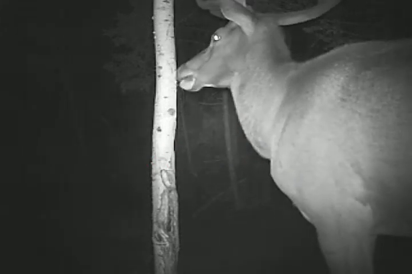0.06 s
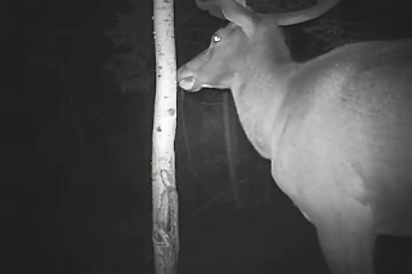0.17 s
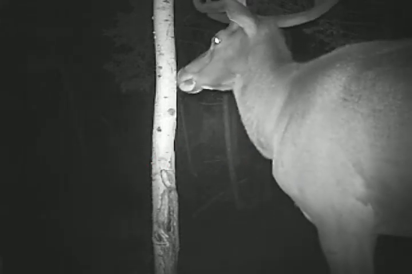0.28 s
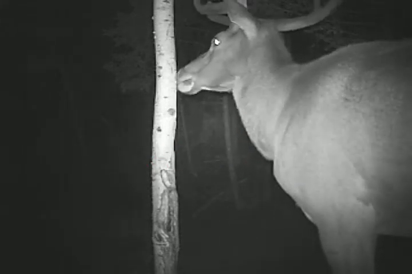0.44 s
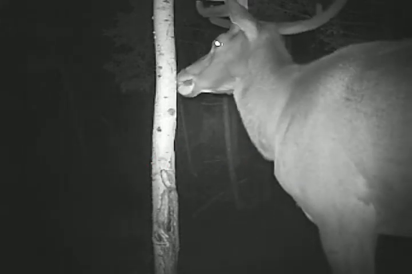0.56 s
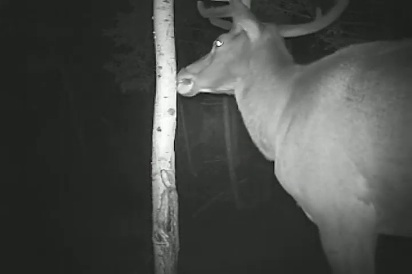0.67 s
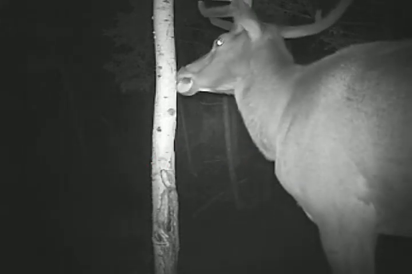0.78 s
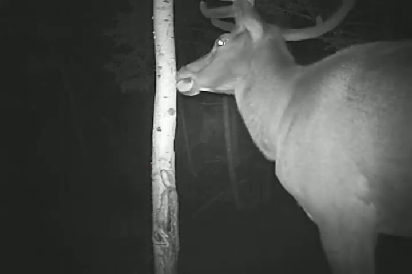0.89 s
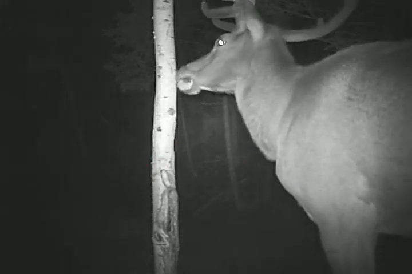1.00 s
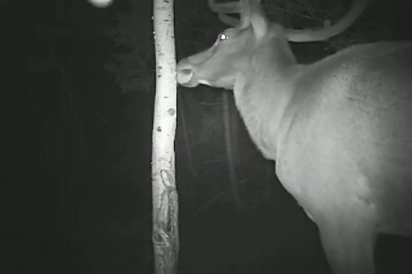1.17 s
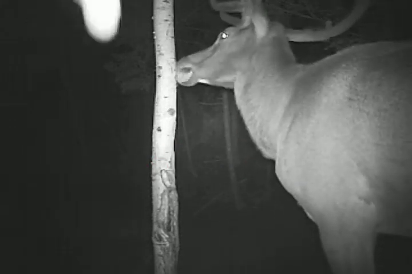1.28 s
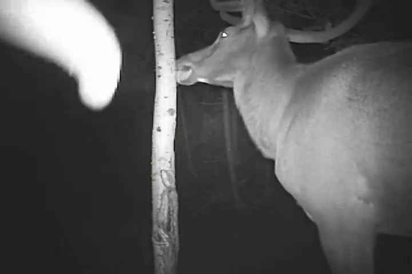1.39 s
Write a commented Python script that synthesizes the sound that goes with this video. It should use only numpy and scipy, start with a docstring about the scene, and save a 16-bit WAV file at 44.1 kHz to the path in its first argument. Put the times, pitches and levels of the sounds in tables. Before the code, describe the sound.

Antlers rasp and clack on bark in two brief strokes, the trunk thrumming low under each. Light taps and a soft rustle fall between them. The microphone is close, outdoors at night, with quiet hiss and air rumble.

```python
"""An elk rubs its antlers on a slim tree at night, close by, over air rumble, recorder hiss and a faint whine.
Two light taps, then a short stroke at 0.2 s: the antler catches and slips on the bark, a gritty rasp
with sharp clacks, while the trunk thrums and the tines ring faintly. A few taps and a soft rustle follow.
A second stroke comes at 0.95 s; low thuds close it and the rustle fades."""
import sys
import numpy as np
from scipy import signal
from scipy.fft import rfft, irfft
from scipy.io import wavfile
from scipy.ndimage import uniform_filter1d, map_coordinates

SR = 44100
rng = np.random.default_rng(int(sys.argv[2]) if len(sys.argv) > 2 else 0)


def wav_out(sig):
    """Save sig, one row per channel (or a flat mono array), as 16-bit PCM at SR to the path in sys.argv[1]."""
    wavfile.write(sys.argv[1], SR, np.round(np.clip(np.atleast_2d(sig).T, -1, 1) * 32767).astype(np.int16))


N = 63945

# resonances of antler on bark: centre_hz, width_hz, gain_db
CONTACT_RESONANCES = [(329, 186, -11.5), (501, 108, -10.5), (620, 234, -12), (933, 90, 0.5), (1410, 65, -1),
                      (1596, 60, -6.5), (1784, 70, -10.5), (1967, 31, -6.5), (2266, 76, -1.5),
                      (2453, 92, -2.5), (3015, 96, 2), (3250, 120, -5.5), (3525, 49, 1), (3951, 51, 1),
                      (4290, 59, -10), (5010, 160, -3)]
# bark crackle spectrum: freq_hz, gain_db
BARK_SPECTRUM = [(3000, -33), (5000, -33), (5600, -6), (7100, 1), (9300, -6), (11300, -1.5), (13500, -13),
                 (16000, -16)]
CRACK_DECAY_S = .0013


def from_db(db):
    """Decibels to gain."""
    return 10 ** (np.asarray(db) / 20)


def rms_one(x):
    """Scale to rms 1."""
    return x / np.sqrt(np.mean(x ** 2) + 1e-20)


def seconds():
    """Time of every sample."""
    return np.arange(N) / SR


def click(start_s):
    """Unit impulse."""
    return 1. * (np.arange(N) == int(start_s * SR))


def gain_curve(points):
    """Gain along (time_s, level_db) points, silent outside them."""
    time_s, level_db = np.transpose(points)
    return from_db(np.interp(seconds(), time_s, level_db, left=-150, right=-150))


def random_curve(knots_per_s):
    """Straight lines between Gaussian random values."""
    knots_s = np.arange(600) / knots_per_s
    return np.interp(seconds(), knots_s, rng.standard_normal(len(knots_s)))


def steady(x, window_samples):
    """Hold the running rms at 1."""
    return x / np.sqrt(np.abs(uniform_filter1d(x * x, window_samples)) + 1e-20)


def colour(x, spectrum):
    """Filter by (freq_hz, gain_db) points; white noise keeps its power."""
    freq_hz, gain_db = np.transpose(spectrum)
    bins_hz = np.arange(N + 1) * SR / (2 * N)
    response = from_db(np.interp(np.log(bins_hz + 1), np.log(freq_hz), gain_db))
    return irfft(rfft(x, 2 * N) * rms_one(response))[:N]


def resonate(x, centre_hz, width_hz):
    """One resonance, peak gain 1."""
    r = np.exp(-np.pi * width_hz / SR)
    poles = [1, -2 * r * np.cos(2 * np.pi * centre_hz / SR), r * r]
    return signal.lfilter(np.array([1, 0, -1]) * (1 - r * r) / 2, poles, x + 1e-18)


def resonator_bank(x, resonances, top_hz):
    """Parallel resonances of alternating sign, then a steep low-pass."""
    summed = sum((-1) ** k * from_db(gain_db) * resonate(x, centre_hz, width_hz)
                 for k, (centre_hz, width_hz, gain_db) in enumerate(resonances))
    return signal.sosfilt(signal.butter(8, top_hz, fs=SR, output="sos"), summed)


def ring(force, modes):
    """A force excites decaying sines."""
    out = 0
    for pitch_hz, gain_db, t60_s in modes:
        r = from_db(-60 / (t60_s * SR))
        w = 2 * np.pi * pitch_hz / SR
        mode = signal.lfilter([0, np.sin(w)], [1, -2 * r * np.cos(w), r * r], force + 1e-18)
        out += from_db(gain_db) * mode
    return out


def slips(rate_per_s=1600, spread_db=2.5):
    """Dense tiny friction slips of uneven size, at an even overall level."""
    sizes = from_db(spread_db * np.minimum(rng.exponential(1, N), 4)) * rng.choice([-1, 1], N)
    return steady(sizes * (rng.random(N) < rate_per_s / SR), window_samples=400)


def background(noise_db=-61, whine_db=-87, line_hz=15625, field_hz=50):
    """Air rumble, hiss and a camera's faint line whine, throbbing at its field rate."""
    # still air and recorder hiss: freq_hz, gain_db
    floor_spectrum = [(20, 4.5), (50, -3.5), (110, -9), (200, -16), (400, -21.5), (900, -26), (2000, -32.5),
                      (3100, -34.5), (4500, -36), (9000, -37.5), (15500, -38.5)]
    phase_per_hz = 2 * np.pi * seconds()
    throb = 1 + .75 * np.sin(field_hz * phase_per_hz)
    whine = from_db(whine_db) * np.sin(line_hz * phase_per_hz) * throb
    return from_db(noise_db) * colour(rng.standard_normal(N), floor_spectrum) + whine


def tree_echoes(x, t60_s=.3, gain_db=-22):
    """Faint scattered echoes from the trees."""
    tail = rng.standard_normal(N) * from_db(-60 * seconds() / t60_s)
    return from_db(gain_db) * signal.fftconvolve(x, tail / np.linalg.norm(tail))[:N]


def rustle():
    """Soft brushing that swells and fades as the animal moves."""
    # brushing envelope: time_s, level_db
    brush_levels = [(0, -66.5), (.045, -65), (.09, -75.5), (.15, -61.5), (.2, -88), (.4, -69), (.47, -68),
                    (.53, -60), (.62, -63.5), (.75, -67.5), (.8, -74), (.92, -65.5), (1.1, -76),
                    (1.25, -61), (1.325, -63.5), (1.36, -74.5), (1.45, -80)]
    # brushing spectrum: freq_hz, gain_db
    brush_spectrum = [(300, -15.5), (850, -12.5), (1900, -14.5), (2330, -4.5), (2600, -11.5), (3020, 5.5),
                      (3270, -11), (3550, 2.5), (3750, -7.5), (4100, -11.5), (4650, -25.5), (5000, -16.5),
                      (5600, -27), (15000, -32)]
    # airy treble envelope: time_s, level_db
    airy_levels = [(0, -70.5), (.045, -64.5), (.09, -84), (.15, -68.5), (.4, -84), (.45, -71.5), (.6, -69),
                   (.76, -70.5), (.8, -82.5), (.92, -70.5), (1.3, -84), (1.36, -74)]
    # airy treble spectrum: freq_hz, gain_db
    airy_spectrum = [(2500, -0.5), (4100, 13.5), (5600, -9.5), (7000, -1.5), (8500, -8), (11500, 1.5),
                     (15000, -14)]
    brush = gain_curve(brush_levels) * colour(rng.standard_normal(N), brush_spectrum)
    airy = gain_curve(airy_levels) * colour(rng.standard_normal(N), airy_spectrum)
    return brush + airy


def taps(spot_db=-5, spot_t60_s=.04, highpass_hz=573):
    """A tine touches the bark lightly; each spot has its own note and brightness."""
    # touches: start_s, level_db, bright_hz, spot_hz
    touches = [(.076, -59, 2500, 1690), (.1065, -52.5, 1300, 670), (0.6456, -50.5, 1700, 800),
               (0.6718, -45, 12000, 896), (0.789, -58, 1820, 1410), (0.899, -56, 1800, 1460)]
    # modes common to all taps: pitch_hz, gain_db, t60_s
    tap_modes = [(970, -7, 0.043), (1455, -15, 0.032), (1690, -9.5, 0.023), (2954, 1, 0.038),
                 (5830, -16, 0.022), (6720, -8, 0.015), (9850, -11.5, .022)]
    out = 0
    for start_s, level_db, bright_hz, spot_hz in touches:
        softness = signal.butter(2, min(bright_hz, SR / 3), fs=SR)
        force = signal.lfilter(*softness, from_db(level_db) * click(start_s) + 1e-18)
        out += ring(force, tap_modes + [(spot_hz, spot_db, spot_t60_s)])
    return signal.lfilter(*signal.butter(2, highpass_hz, "high", fs=SR), out)


def trunk():
    """The trunk thrums under each stroke and knocks as the weight shifts."""
    # swaying load, one list per stroke: time_s, level_db
    loads = [
        [(.17, -62), (.205, -56.5), (.24, -43.5), (.26, -50), (.305, -43), (.34, -48), (.395, -50), (.42, -57),
         (.52, -74)],
        [(.88, -63), (.945, -62.5), (.965, -48.5), (1.03, -47), (1.065, -43), (1.11, -50.5), (1.185, -50.5),
         (1.23, -63), (1.33, -63.5)],
    ]
    # bending resonances: centre_hz, width_hz, gain_db
    bending = [(71.5, 54, -6), (111.9, 18.5, 5), (145, 16.4, -3.5), (172, 20.6, -3), (292, 210, -20)]
    # dull thuds and woody knocks: start_s, level_db, pitch_hz, t60_s
    thuds = [(.193, -48, 292, 0.098), (0.232, -29.5, 161, 0.028), (.242, -42.5, 920, 0.023),
             (0.954, -39, 296.4, 0.064), (1.0525, -33.5, 976, 0.02), (1.067, -38, 145, 0.059),
             (1.224, -47.5, 39.3, 0.41), (1.258, -39, 56, 0.12)]
    thrum = steady(resonator_bank(slips(), bending, top_hz=337), window_samples=1200)
    load = sum(gain_curve(stroke) for stroke in loads)
    knocks = sum(ring(click(start_s), [(pitch_hz, level_db, t60_s)])
                 for start_s, level_db, pitch_hz, t60_s in thuds)
    return thrum * load + knocks


def tines(scraping, relative_db=-13.5):
    """The antler rings on after the scraping."""
    # tine modes: pitch_hz, gain_db, t60_s
    tine_modes = [(1416, -3, 0.23), (1626, -2, 0.25), (2245, 8, 0.083), (2600, 5, 0.25), (2970, -6.5, 0.26)]
    return from_db(relative_db) * np.std(scraping) * rms_one(ring(scraping, tine_modes))


def chips():
    """Bark flakes break off with short bright cracks."""
    # flakes: start_s, level_db
    flakes = [(.2748, -48.5), (0.299, -56), (.957, -51.5), (1.012, -54.5), (1.0498, -55)]
    envelope = 0
    for start_s, level_db in flakes:
        age = (seconds() - start_s) / CRACK_DECAY_S
        envelope += from_db(level_db) * (age >= 0) * np.exp(-np.abs(age))
    return colour(envelope * rng.standard_normal(N), BARK_SPECTRUM)


def clacks(skid_gain=2, contact_db=7, snap_db=1, snap_t60_lengths=3.8, crackle_base_db=-29.5):
    """The antler catches and lets go: each release is a ringing snap and a short skid."""
    # releases: start_s, level_db, length_s, pitch_hz, top_hz, crackle_db
    releases = [(0.203, -40.5, 0.0057, 3250, 4180, 1), (0.2274, -28, 0.0072, 3120, 4160, -5.5),
                (0.236, -41, 0.011, 3290, 4270, -5), (0.273, -35.5, 0.0093, 3020, 4070, 5),
                (0.3695, -42, 0.0087, 3150, 3260, -7), (0.648, -50, 0.0091, 3114, 3200, -18),
                (0.9578, -34, 0.012, 3534, 3580, -18), (0.984, -37.5, 0.0054, 3080, 3600, -1),
                (1.0106, -38, 0.01, 3000, 3540, -6), (1.025, -41, 0.005, 3050, 3900, 1),
                (1.0473, -41, 0.014, 3050, 3950, 2), (1.0605, -28, 0.0017, 3170, 3820, -15),
                (1.0639, -42, 0.019, 2983, 3580, -12), (1.073, -37.5, 0.012, 3160, 3550, -15),
                (1.093, -44.5, 0.011, 3110, 3260, -16), (1.158, -46.5, 0.0054, 3100, 3250, -12)]
    # snap modes: pitch_ratio, gain_db
    snap_modes = [(0.749, -7.5), (1.003, 6), (1.09, -4)]
    out = 0
    for start_s, level_db, length_s, pitch_hz, top_hz, crackle_db in releases:
        age = (seconds() - start_s) / length_s
        skid = (age >= 0) * from_db(-12 * age ** 2) * slips()
        force = click(start_s) + skid_gain * skid / np.linalg.norm(skid)
        contact = from_db(contact_db) * resonate(force, pitch_hz, width_hz=600)
        knock = resonator_bank(force + contact, CONTACT_RESONANCES, top_hz)
        modes = [(pitch_hz * ratio, db, snap_t60_lengths * length_s) for ratio, db in snap_modes]
        snap = ring(click(start_s), modes)
        # a yielding contact rounds the onset: band 3900 Hz wide
        snap = resonator_bank(snap, [(pitch_hz, 3900, 0)], top_hz)
        clack = rms_one(rms_one(knock) + from_db(snap_db) * rms_one(snap))
        crackle = from_db(crackle_base_db + crackle_db) * rms_one(colour(force, BARK_SPECTRUM))
        out += from_db(level_db) * np.sqrt(length_s * SR / N) * (clack + crackle)
    return out


def bark_crackle(crumbs_per_s=700, bed_gain=.5):
    """Crisp noise bursts as the bark crumbles."""
    breaks = (rng.random(N) < crumbs_per_s / SR) * rng.uniform(0.37, 1, N)
    bursts = signal.lfilter([1], [1, -np.exp(-1 / (CRACK_DECAY_S * SR))], breaks)
    crumbling = steady(rng.standard_normal(N) * (bursts + bed_gain), window_samples=700)
    return colour(crumbling, BARK_SPECTRUM)


def wander(x, pitch_spread=.014):
    """The resonances waver in pitch as the contact slides along the antler."""
    speed_offset = pitch_spread * random_curve(knots_per_s=55)
    return map_coordinates(x, [np.arange(N) + np.cumsum(speed_offset)], order=3, mode="mirror")


def judder(spread_db=1.8):
    """Uneven gain of the antler sticking and jerking free."""
    return from_db(spread_db * random_curve(knots_per_s=110))


def rasp(crackle_exponent=.15):
    """Slips drive the contact resonances; the bark crackles more the harder it is rubbed."""
    # friction, one list per stroke: time_s, level_db
    strokes = [
        [(.165, -77), (.184, -53.5), (.207, -44), (.221, -49.5), (.24, -43.5), (.258, -47), (.268, -43.5),
         (.286, -36.5), (.305, -36), (.33, -47.5), (.36, -58.5), (.385, -82), (.405, -100)],
        [(.949, -62), (.955, -39), (.966, -41), (.977, -51.5), (1.005, -42.5), (1.02, -38), (1.041, -41),
         (1.056, -38.5), (1.072, -39.5), (1.12, -61), (1.19, -60.5), (1.22, -74)],
    ]
    # brightness per stroke: top_hz, crackle_db
    brightness = [(4070, -25), (3900, -25.5)]
    out = 0
    for stroke, (top_hz, crackle_db) in zip(strokes, brightness):
        friction = gain_curve(stroke)
        crackle = from_db(crackle_db) * bark_crackle() * (friction / friction.max()) ** crackle_exponent
        scrape = resonator_bank(slips(), CONTACT_RESONANCES, top_hz)
        scrape = steady(wander(scrape), window_samples=300)
        out += (scrape + crackle) * judder() * friction
    return out


def scene():
    """Antler on bark, the trunk and the night around them, in mono."""
    scraping = rasp()
    contact = scraping + clacks() + chips() + taps()
    return (contact + tines(scraping) + tree_echoes(contact) + trunk() + rustle() + background())[None]


def record(dry):
    """Steep low-pass."""
    cutoff_hz = 15800
    return signal.sosfilt(signal.ellip(12, .1, 80, cutoff_hz, fs=SR, output="sos"), dry)


dry = scene()
out = record(dry)
wav_out(out)
```